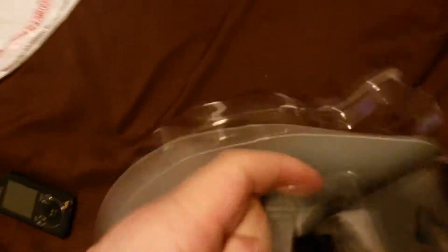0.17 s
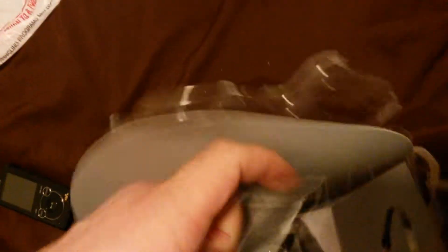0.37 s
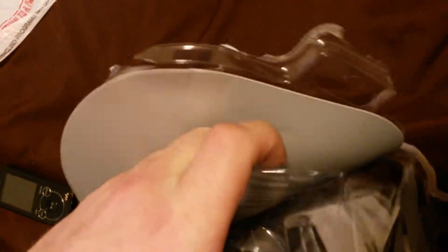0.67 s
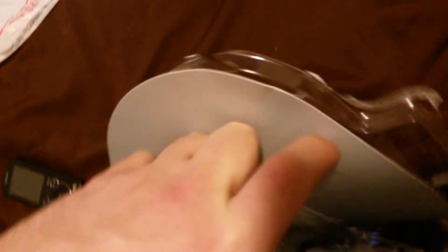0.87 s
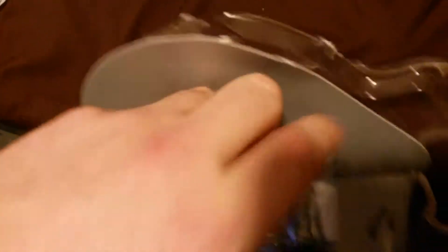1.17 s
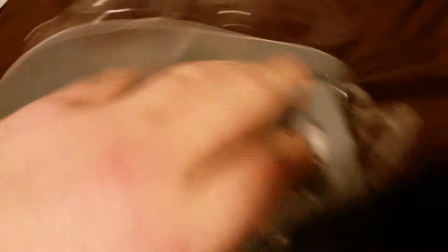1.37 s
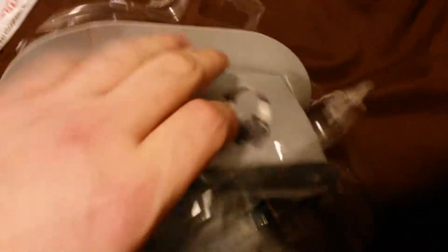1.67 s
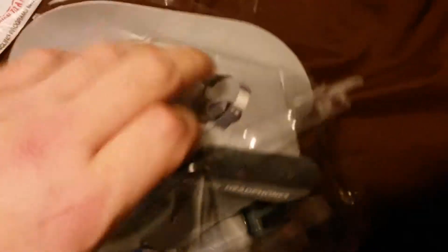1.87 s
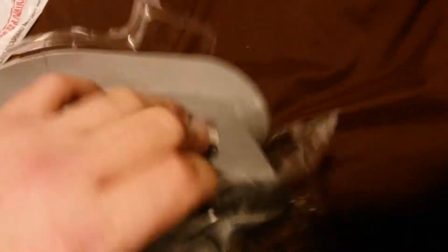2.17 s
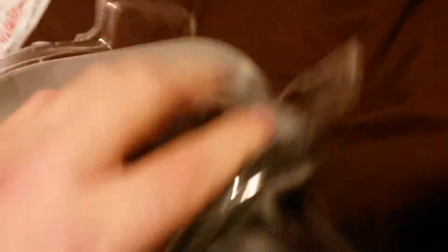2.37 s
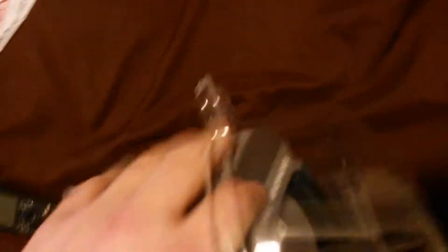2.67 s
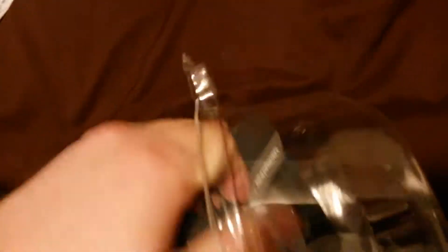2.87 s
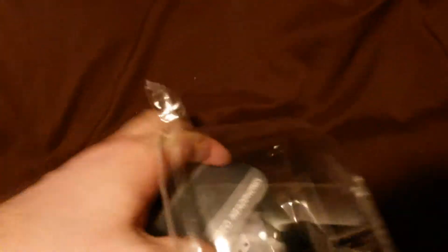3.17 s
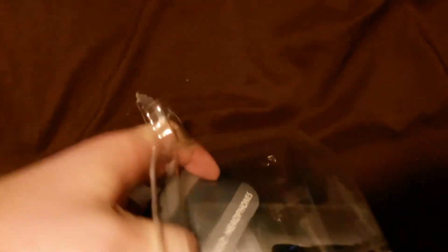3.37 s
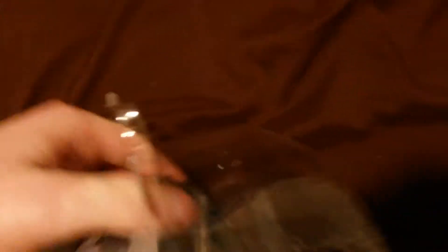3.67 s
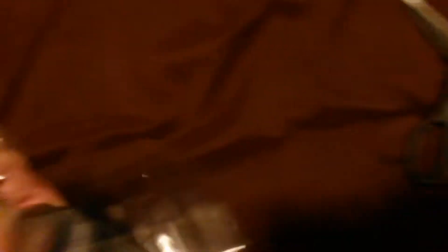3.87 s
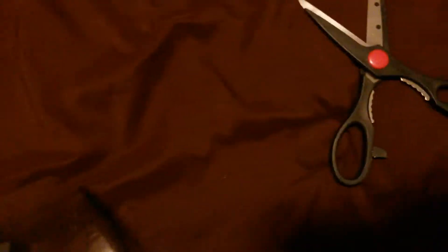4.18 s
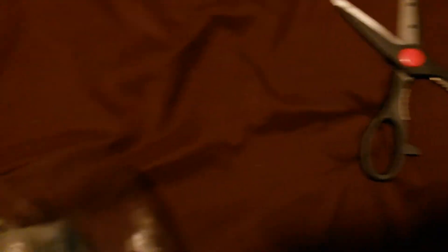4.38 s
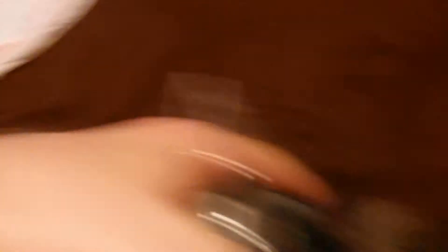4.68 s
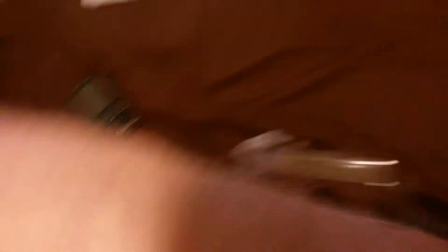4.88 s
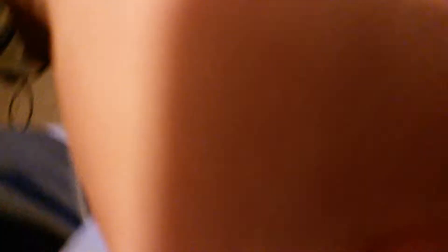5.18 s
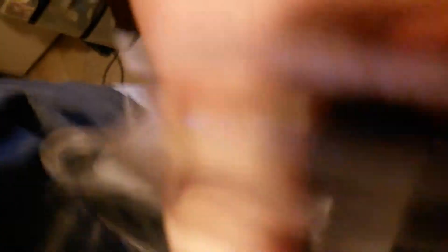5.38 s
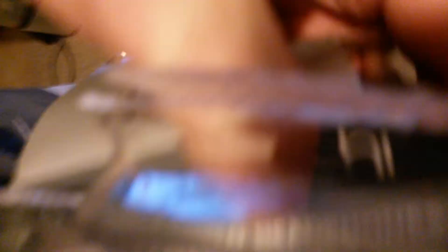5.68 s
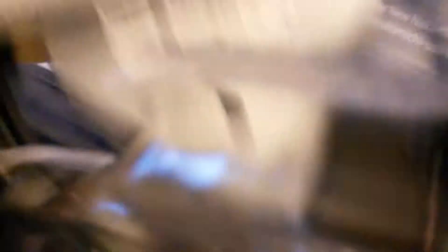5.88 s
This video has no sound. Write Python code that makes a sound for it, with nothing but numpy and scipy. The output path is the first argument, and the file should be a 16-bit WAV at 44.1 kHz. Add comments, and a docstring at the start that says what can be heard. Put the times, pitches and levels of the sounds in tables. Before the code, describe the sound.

Close stereo capture of rigid plastic packaging being pulled about by hand. Bright, dry crackles and lower buckling pops come in irregular clusters, with brief hissing slides and soft thuds of the whole pack. It quietens shortly before the end, then crunches loudly and is knocked on the right. Short room reflections and a low, quiet fan hum surround it.

```python
"""Stiff clear package, pulled open close by

Hands flex a plastic package just in front of a microphone pair, in a small room with a humming fan.
Facets buckle as short bursts of filtered noise: a sharp crack, a panel flex and a hollow shell ring.
Sheets slide as stick-slip noise, knocks are dull thuds; at last the pack swings past the pair and is bumped.
The room answers with decaying noise, the fan is an air rush with tones, and each microphone port rings
at its own treble pitch, which colours every snap."""
import sys
import numpy as np
from scipy import signal
from scipy.fft import rfft, irfft, next_fast_len
from scipy.io import wavfile
from scipy.ndimage import uniform_filter1d, map_coordinates

SR = 44100
rng = np.random.default_rng(int(sys.argv[2]) if len(sys.argv) > 2 else 0)


def unload_audio(sound):
    """Save the sound as a 16-bit wav file, at the path given as the first command line argument."""
    columns = np.transpose(np.atleast_2d(sound))
    # keep every value between -1 and 1, then stretch to whole-number steps
    steps = np.round(np.clip(columns, -1, 1) * 32767)
    wavfile.write(sys.argv[1], SR, steps.astype(np.int16))


N = 265923

# Facets that buckle: [t/s, crack level/dB, flex level/dB, shell level/dB, crack t60/s, left over right/dB];
# the crack level is before CRACK_TRIM_DB
FACET_SNAPS = [(.074, -35, -43, -66, 0.0083, 8), (.1742, -43.5, -46, -53, .008, 1),
               (.2244, -39.5, -50, -53, .025, 4), (.2406, -11, -13.5, -38, 0.004, 5),
               (.2571, -17.5, -24, -30, 0.019, 0.5), (.361, -24, -27.5, -35.5, 0.013, 7),
               (.4232, -38.5, -42, -37.5, 0.031, -1), (.4727, -75, -36.5, -46, 0.0077, 1),
               (.503, -70, -36, -45, 0.016, -5), (.5325, -40, -42, -59, 0.022, -2),
               (.7182, -18.5, -30.5, -44.5, 0.013, -3.5), (.8115, -46, -45, -44, 0.011, 2),
               (1.1163, -51, -43, -56, 0.017, 5), (1.1624, -37, -46, -50, 0.02, 2),
               (1.1765, -33.5, -26, -34.5, 0.017, 5), (1.2113, -31, -23.5, -37, 0.0054, 16),
               (1.2174, -26.5, -51, -56, 0.029, 1.5), (1.2945, -21, -25.5, -40.5, 0.011, 10),
               (1.3597, -32.5, -28, -40, 0.022, 6), (1.38, -27.5, -32, -59, 0.023, 2),
               (1.404, -24.5, -30, -39, 0.017, -1), (1.4824, -31.5, -40, -42, .013, -2),
               (1.589, -38, -43.5, -62, 0.043, 8), (1.6154, -40, -48, -43.5, 0.019, 11),
               (1.7519, -20, -27, -45, 0.0053, 3), (1.7734, -22.5, -37.5, -42, 0.011, 3),
               (1.8039, -30, -39, -33, 0.0033, 7), (1.8345, -28, -55, -62, 0.0044, 10),
               (1.845, -24, -39, -44, 0.0013, 2), (1.8679, -23.5, -42, -42.5, 0.0069, 15),
               (1.9514, -33.5, -47, -44.5, 0.02, 12), (2.0597, -21.5, -33, -41.5, 0.0085, 8),
               (2.1715, -49, -39, -36.5, 0.018, 3), (2.1932, -63, -36, -51, 0.011, -5),
               (2.2208, -19.5, -31.5, -29, 0.0071, 0.5), (2.2236, -26, -29.5, -28.5, 0.071, -1),
               (2.2473, -25, -42, -43, 0.069, 3), (2.3696, -21, -39, -30.5, 0.011, -3),
               (2.3738, -29, -23.5, -32.5, 0.0031, 3), (2.4079, -27.5, -60, -56, 0.0053, 11),
               (2.455, -31, -41.5, -57, .01, 13), (2.4857, -19.5, -22.5, -25, 0.0069, 6),
               (2.5493, -24.5, -30.5, -25, 0.0071, 1), (2.5575, -27.5, -38, -31, 0.071, 5),
               (2.6217, -29, -38, -27.5, 0.013, 13), (2.6572, -61, -22.5, -41, 0.003, -9.5),
               (2.7075, -38, -59, -60, 0.0025, 13), (2.794, -29, -33.5, -34, 0.015, 8.5),
               (2.918, -34.5, -38, -32, 0.12, 2), (2.9754, -22, -41.5, -66, 0.004, 14),
               (3.0397, -42, -40, -43, 0.019, -2), (3.1064, -35.5, -49.5, -52, 0.0065, 13),
               (3.153, -39, -39.5, -40.5, 0.015, 0), (3.2613, -39, -39.5, -44.5, 0.021, -0.5),
               (3.5504, -36, -34, -36.5, 0.021, -13), (3.7202, -28, -46, -50, .003, 9),
               (3.7584, -28, -39.5, -45, 0.0085, 3.5), (3.8, -28, -33.5, -32.5, 0.0054, 1),
               (3.806, -16, -29, -39, 0.015, -3.5), (3.9109, -27, -44.5, -61, 0.0044, 7),
               (3.9315, -50, -36, -48, 0.0092, -4), (3.9698, -31, -39, -55, 0.028, -14),
               (4.0235, -16.5, -28.5, -30.5, 0.02, 9), (4.0541, -22, -30, -24, 0.035, -6),
               (4.19, -38.5, -45.5, -51, 0.11, -3.5), (4.4829, -26.5, -40, -39, 0.0083, 6),
               (4.5023, -17, -37.5, -29, 0.013, -3.5), (4.513, -28, -37.5, -27.5, 0.022, -2),
               (4.5592, -33.5, -48, -43.5, 0.039, 0), (4.7283, -13, -20.5, -27.5, 0.022, 1.5),
               (4.9605, -27.5, -34, -39.5, 0.028, -4.5), (5.0106, -55, -41, -45.5, .009, 7),
               (5.5986, -49, -28.5, -41.5, 0.0072, 2), (5.6105, -31.5, -17.5, -21.5, .009, -4.5),
               (5.621, -38, -32, -25, 0.031, -9), (5.6334, -20.5, -19.5, -27, 0.007, -4.5),
               (5.6529, -39, -18.5, -27, 0.0079, 6), (5.7197, -38.5, -32, -40.5, 0.04, -3),
               (5.7397, -46, -30.5, -40, 0.0084, -2), (5.8358, -37, -33.5, -39.5, 0.12, 3),
               (5.8938, -41, -25, -25.5, 0.0071, 0), (5.908, -17.5, -17, -23, 0.019, -9),
               (5.935, -20, -18, -35, 0.013, -12.5), (5.9857, -34, -21.5, -38, 0.011, -5)]
# Knocks of the whole pack: [t/s, level/dB, centre of the added peak f/Hz, t60/s]
PACK_BUMPS = [(0.242, -24.5, 200, 0.019), (.256, -31, 75, 0.08), (.423, -39, 330, 0.03),
              (2.222, -42, 280, 0.13), (2.549, -38.5, 250, 0.18), (2.916, -37.5, 300, 0.051),
              (3.025, -42.5, 330, .06), (4.029, -32.5, 172, 0.17), (4.056, -45, 310, 0.1),
              (4.255, -42, 160, 0.046), (4.408, -48, 500, 0.092), (4.503, -30, 131, 0.037),
              (4.586, -55, 550, 0.055), (4.65, -43, 450, 0.022), (5.412, -47, 750, .09),
              (5.618, -32, 300, 0.19), (5.874, -28, 91, 0.094), (5.906, -24, 330, 0.049),
              (5.919, -14, 220, 0.088), (5.951, -21.5, 88, 0.086), (5.99, -38.5, 79, 0.11)]
# Part of the pack being worked: [t/s, left over right of the sliding/dB, facet f/Hz, base panel f/Hz]
WORKED_PART = [(0, 6.5, 5300, 2700), (1.2, 4, 5400, 2800), (2.1, 4.5, 5500, 2570), (2.6, 3, 5360, 2010),
               (3.6, .5, 6700, 2730), (4.498, -3, 6900, 2000), (5.3, 2, 6000, 3020),
               (5.7, -6.5, 7800, 2640), (5.91, -11, 10400, 1820), (6.03, -1, 9150, 2740)]
# Sheets sliding over each other or the skin:
# [t/s, length/s, scrape level/dB, hollow rustle level/dB, rise over the stroke/dB]
SLIDING_STROKES = [(0, 0.0088, -35, -38.5, 0.5), (0.262, .13, -38.5, -50.5, -13.5),
                   (0.443, .03, -47, -38.5, 2), (0.581, .09, -42.5, -51.5, -1),
                   (.725, .06, -45.5, -52.5, -7.5), (1.255, 0.036, -36, -57, 13.5),
                   (1.317, .14, -39, -48, 1.5), (1.567, 0.029, -31, -62, -4), (1.638, .065, -40, -47, 3),
                   (1.763, .06, -41, -51, 0.5), (1.882, 0.13, -43, -50.5, -5), (2.1, 0.077, -35.5, -68, 0),
                   (2.265, .08, -43, -50.5, -2), (2.563, .135, -37, -45, 0.5),
                   (2.733, 0.084, -49, -49, -0.5), (2.828, 0.022, -43, -72, 1),
                   (2.926, .11, -43, -50.5, -4.5), (3.236, .085, -42.5, -44, -4),
                   (3.394, 0.12, -48, -54.5, -3), (3.529, .095, -32.5, -45, -7),
                   (3.766, .03, -43, -51, 0.5), (3.805, .075, -39.5, -45, -8.5), (3.955, .12, -33, -44, 6),
                   (4.032, .04, -35.5, -30, -7.5), (4.243, .07, -39.5, -50, -12),
                   (4.387, .1, -41.5, -45, 2), (4.563, .165, -43.5, -50.5, -1.5),
                   (4.735, .09, -36.5, -49.5, -14.5), (4.879, 0.055, -44.5, -60, -2),
                   (5.371, .11, -50, -48, 3), (5.632, .19, -42, -43, -7.5), (5.841, .19, -32, -34.5, 8),
                   (5.895, .05, -30, -25, 2.5), (5.993, .03, -28.5, -36, 4)]
# Firmness of the hold between strokes: [t/s, level/dB]
HAND_GRIP = [(0, -1), (.9, 1.5), (1.15, 0.5), (1.5, 4), (1.74, -3.5), (2.45, -3.5), (3.1, 4.5), (3.7, -3.5),
             (4.6, 2), (5.2, -0.5), (5.46, -8), (5.51, -20), (5.58, -14), (6.03, -1)]

# Spectrum of a facet's crack: [f/Hz, relative level per Hz/dB]
CRACK_SPECTRUM = [(1500, -31.5), (3200, -8.5), (4500, -3.5), (7000, -1.5), (10000, -2), (15000, 3.5)]
# Spectrum of a flexing panel: [f/Hz, relative level per Hz/dB]
FLEX_SPECTRUM = [(400, -47), (900, 4.5), (1300, 4.5), (2600, -2), (3800, -3), (5500, -8), (10000, -59)]
# Spectrum of the hollow shell: [f/Hz, relative level per Hz/dB]
SHELL_SPECTRUM = [(50, -25), (130, -6), (300, 1.5), (520, 6), (900, -0.5), (1400, -3.5), (3000, -62.5)]
# Spectrum of the sliding hiss: [f/Hz, relative level per Hz/dB]
SCRAPE_SPECTRUM = [(900, -7), (2200, -2.5), (4000, 0.5), (6500, -0.5), (9000, 0), (14500, -2)]
# Spectrum of the hollow rustle: [f/Hz, relative level per Hz/dB]
RUSTLE_SPECTRUM = [(60, -21.5), (180, -8), (380, -3.5), (800, -6.5), (1300, -8.5), (2500, -12.5),
                   (8000, -48.5)]
# Spectrum of a knock before its peak: [f/Hz, relative level per Hz/dB]
THUD_SPECTRUM = [(20, -15), (55, -3.5), (110, 0.5), (200, -6.5), (320, -1), (480, -14.5), (1000, -44)]
# Spectrum of the fan's air: [f/Hz, relative level per Hz/dB]
AIR_SPECTRUM = [(20, -26), (45, -25), (85, -7), (270, -1), (550, -9.5), (1200, -21.5), (4000, -23.5),
                (15000, -23.5)]
# Mains and blade tones of the fan: [f/Hz, rms level/dB]
FAN_TONES = [(120, -60.5), (221, -71), (425, -78.5), (705, -77)]
# Left-right likeness at the microphone pair: [f/Hz, correlation from 0 to 1]
LIKENESS = [(60, 0.45), (300, 0.87), (700, 0.74), (1500, 0.38), (3000, 0.03), (15000, 0.039)]
# Decay of the small room: [f/Hz, t60/s]
ROOM_DECAY = [(100, 0.12), (500, 0.23), (3000, 0.27), (7000, 0.22), (15000, 0.19)]
# Response of the left microphone port: [f/Hz, level/dB]
LEFT_RESPONSE = [(500, -3.5), (1400, -5), (2400, -0.5), (3600, 3), (4800, 7), (5500, 9), (6050, 11.5),
                 (6800, 8.5), (8200, 1.5), (10200, -3), (14500, -16.5)]
# Response of the right microphone port: [f/Hz, level/dB]
RIGHT_RESPONSE = [(500, -2), (1300, -5.5), (2000, -6), (4500, -5.5), (6800, -5), (8400, 7), (10000, -3.5),
                  (14500, -14)]

CRACK_TRIM_DB = 1
# A facet creeps before it flips: shortest 60 dB rise, plus this share of its t60
CREEP_S, CREEP_SHARE = 0.0026, 0.21
PANEL_DB_PER_OCTAVE = 58  # the more flex outweighs crack, the lower the panel
# Small random facets: crack over the scrape, its scatter either way, its t60
SMALL_DB, SMALL_SCATTER_DB, SMALL_T60_S = -3, 4, .005
SMALL_FLEX_DB, SMALL_SHELL_DB = -7.5, -15.5  # relative to their table crack
STROKE_ATTACK_S, STROKE_RELEASE_T60_S = 0.013, 0.1
GRIP_SCRAPE_DB, GRIP_RUSTLE_DB = -54, -59.5  # faint sliding at a grip of 0 dB
BASS_CUT_HZ, TOP_HZ = 40, 14800


def snaps(facet_db=7, facet_octaves=0.51, panel_db=9, panel_octaves=0.91, uneven_db=3,
          flex_ring=1.66, shell_t60=0.047, after_db=-26, after_t60=0.015, size=4096):
    """Each facet creeps, flips with a crack, flexes its panel and sets the hollow shell ringing."""
    out = np.zeros((2, N))
    lead = 1 / 100  # s kept before the flip for the creep
    t = np.arange(size) / SR - lead
    since, before = np.maximum(t, 0), np.maximum(-t, 0)
    place_s, _, facets_hz, panels_hz = np.transpose(WORKED_PART)
    for s, crack, flex, shell, t60, left_db in list(FACET_SNAPS) + small_snaps():
        facet_hz = np.interp(s, place_s, facets_hz)
        panel_hz = np.interp(s, place_s, panels_hz) * 2 ** ((crack - flex) / PANEL_DB_PER_OCTAVE)
        rise = CREEP_S + CREEP_SHARE * t60
        swell = amp(-60 * before / max(rise, 1e-4))
        modes = ripple()

        def dying(life):
            return swell * amp(-60 * since / max(life, 1e-3))

        def facet_gain(hz):
            peak = facet_db * hill(hz, facet_hz, facet_octaves)
            return along(CRACK_SPECTRUM, hz) + peak + uneven_db * modes(hz)

        def panel_gain(hz):
            peak = panel_db * hill(hz, panel_hz, panel_octaves)
            return along(FLEX_SPECTRUM, hz) + peak + uneven_db * modes(hz)

        # bending waves run on through the sheet after the flip
        sheet = amp(after_db) * dying(after_t60)
        bright = amp(crack + CRACK_TRIM_DB) * burst(dying(t60) + sheet, facet_gain)
        bend = amp(flex) * burst(dying(t60 * flex_ring) + sheet, panel_gain)
        hollow = amp(shell) * burst(dying(shell_t60), lambda hz: along(SHELL_SPECTRUM, hz))
        add(out, s - lead, panned(left_db) * (bright + bend) + hollow)
    return out


def small_snaps(count=28):
    """Random small facets give way, more of them and louder where the sheets slide harder."""
    scrape_db, _ = sliding()
    left_db, _, _ = curves(WORKED_PART)
    work = np.cumsum(np.sqrt(amp(scrape_db / 2)))
    when, size, side = rng.random((count, 3)).T
    at = np.minimum(np.searchsorted(work, when * work[-1]), N - 1)
    cracks = scrape_db[at] + SMALL_DB + SMALL_SCATTER_DB * (2 * size - 1)
    sides = left_db[at] + 10 * (side - .5)
    return [(s, db, db + SMALL_FLEX_DB, db + SMALL_SHELL_DB, SMALL_T60_S, left)
            for s, db, left in zip(at / SR, cracks, sides)]


def ripple(spacing_hz=330, size=90):
    """The uneven modes of one patch of sheet: a random gain of frequency, about +-1."""
    heights = rng.standard_normal(size)
    return lambda hz: np.interp(hz, np.arange(size) * spacing_hz, heights)


def burst(envelope, gain_db):
    """Many close modes struck at once, as noise with the energy of 10 ms at rms 1."""
    noise = rng.standard_normal((2, len(envelope)))
    sound = spread(coloured(envelope * noise, gain_db))
    energy = np.mean(np.sum(sound ** 2, axis=1))
    return sound * np.sqrt(SR / 100 / (energy + 1e-20))


def rubbing(flutter_db=2.5, lumps_db=3.5):
    """Sliding sheets hiss and tick by stick-slip, and the shell adds a lumpy, hollow rustle."""
    scrape_db, rustle_db = sliding()
    left_db, _, _ = curves(WORKED_PART)
    ticks = slips(rate=200, scatter_db=5, life=.0011)
    roughness = np.hypot(.65, .7 * ticks)  # steady hiss and ticks together
    pressure_db = flutter_db * wobble(45)

    def friction(spectrum):
        noise = roughness * rng.standard_normal((2, N))
        return unit(spread(coloured(noise, lambda hz: along(spectrum, hz))))

    scrape = amp(scrape_db + pressure_db) * panned(left_db) * friction(SCRAPE_SPECTRUM)
    rustle_gain = amp(rustle_db + lumps_db * wobble(40))
    rustle = rustle_gain * panned(left_db / 2) * friction(RUSTLE_SPECTRUM)
    return scrape + rustle


def sliding():
    """Scrape and rustle levels/dB: grip plus each stroke's attack, swelling or sinking hold, and release."""
    grip_db, = curves(HAND_GRIP)
    power = amp([grip_db + GRIP_SCRAPE_DB, grip_db + GRIP_RUSTLE_DB]) ** 2
    t = np.arange(SR // 2) / SR
    for s, length, scrape_db, rustle_db, swell_db in SLIDING_STROKES:
        attack = np.minimum(t / STROKE_ATTACK_S, 1)
        hold = amp(swell_db * (np.minimum(t / length, 1) - .5))
        release = np.exp(-np.log(1000) * np.maximum(t - length, 0) / STROKE_RELEASE_T60_S)
        levels = amp([[scrape_db], [rustle_db]])
        add(power, s, (levels * attack * hold * release) ** 2)
    return 10 * np.log10(power)


def slips(rate, scatter_db, life):
    """Envelope of tiny stick-slip releases at random times, a few much larger than the rest."""
    sizes = amp(scatter_db * np.minimum(rng.exponential(size=N), 2.5))
    kicks = (rng.random(N) < rate / SR) * sizes
    releases = signal.lfilter([1], [1, -np.exp(-1 / (life * SR))], kicks)
    # the hand feeds in work steadily, so nearby releases share it
    nearby_power = np.abs(uniform_filter1d(releases ** 2, size=2600))
    return releases / np.sqrt(nearby_power + 1e-6)


def bumps(attack=0.0023, peak_db=8, peak_octaves=1.0):
    """Soft knocks move the pack as a whole: a short dull thud."""
    out = np.zeros((2, N))
    t = np.arange(SR // 4) / SR
    for s, db, pitch_hz, t60 in PACK_BUMPS:
        envelope = (1 - np.exp(-t / attack)) * np.exp(-np.log(1000) * t / t60)

        def thud_gain(hz):
            return along(THUD_SPECTRUM, hz) + peak_db * hill(hz, pitch_hz, peak_octaves)

        add(out, s, amp(db) * burst(envelope, thud_gain))
    return out


def room(x, build=0.0039, count=24):
    """The room's diffuse answer, decaying noise drawn afresh each stretch as the pack moves."""
    out = np.zeros((2, N))
    hop = N // count + 1
    for start in range(0, N, hop):
        hz, t, z = signal.stft(rng.standard_normal((2, SR // 2)), SR, nperseg=256)
        decay = np.exp(-np.log(1000) * t / along(ROOM_DECAY, hz)[:, None])
        onset = 1 - np.exp(-t / build)
        tail = signal.istft(z * decay * onset, SR, nperseg=256)[1]
        tail = spread(tail) / np.linalg.norm(tail[0])
        mono = x[:, start:start + hop].sum(axis=0, keepdims=True) / np.sqrt(2)
        add(out, start / SR, signal.fftconvolve(mono, tail, axes=1))
    return out


def fan(air_db=-59, waver=0.6):
    """A steady rush of air and a few tones whose phase wanders slightly (waver in radians)."""
    t = np.arange(N) / SR
    noise = rng.standard_normal((2, N))
    air = unit(spread(coloured(noise, lambda hz: along(AIR_SPECTRUM, hz))))
    tones = np.zeros(N)
    for hz, db in FAN_TONES:
        phase = 2 * np.pi * hz * t + waver * wobble(2.5)
        tones += amp(db) * np.sqrt(2) * np.sin(phase)
    return amp(air_db) * air + tones


def amp(db):
    """Decibels to gain."""
    return 10 ** (np.asarray(db) / 20)


def unit(x):
    """x scaled to rms 1."""
    return x / np.sqrt(np.mean(x ** 2) + 1e-20)


def along(points, hz):
    """(Hz, value) points read on a log axis."""
    f, v = np.transpose(points)
    return np.interp(np.log(hz + 1), np.log(f + 1), v)


def hill(hz, centre_hz, octaves):
    """A broad resonance of height 1 on a log-frequency axis."""
    return np.exp(-(np.log2((hz + 1) / centre_hz) / octaves) ** 2)


def curves(rows):
    """One value per sample for each column after the time."""
    s, *cols = np.transpose(rows)
    return [np.interp(np.arange(N) / SR, s, c) for c in cols]


def wobble(rate):
    """A smooth random curve, rate knots a second."""
    knots = rng.standard_normal(int(N * rate / SR) + 4)
    return map_coordinates(knots, [np.arange(N) * rate / SR])


def panned(left_db):
    """Left and right gains of constant power."""
    gains = amp(np.array([left_db, -left_db]) / 2).reshape(2, -1)
    return gains / np.sqrt(np.mean(gains ** 2, axis=0))


def coloured(x, gain_db, size=2048):
    """x through the causal minimum-phase filter whose gain is gain_db(Hz)."""
    cepstrum = irfft(np.log(amp(gain_db(np.fft.rfftfreq(size, 1 / SR)))))
    # folding the cepstrum onto positive times makes the filter causal
    cepstrum[1:size // 2] *= 2
    cepstrum[size // 2 + 1:] = 0
    response = irfft(np.exp(rfft(cepstrum)))
    response = response.reshape((1,) * (x.ndim - 1) + (-1,))
    return signal.fftconvolve(x, response, axes=-1)[..., :x.shape[-1]]


def spread(pair):
    """Two unrelated signals become left and right: more alike in the bass, apart in the treble."""
    size = next_fast_len(pair.shape[1] + 512)
    likeness = along(LIKENESS, np.fft.rfftfreq(size, 1 / SR))
    turn = np.arccos(np.clip(likeness, -1, 1)) / 2
    mid, side = irfft(rfft(pair, size) * [np.cos(turn), np.sin(turn)], size)[:, :pair.shape[1]]
    return np.array([mid + side, mid - side])


def add(track, s, sound):
    """Mix a two-row sound in at time s."""
    start = max(round(s * SR), 0)
    part = track[:, start:start + sound.shape[1]]
    part += sound[:, :part.shape[1]]


def scene(room_db=-15):
    """The pack close by, the room around it and the fan behind."""
    pack = snaps() + bumps() + rubbing()
    return pack + amp(room_db) * room(pack) + fan()


def record(dry):
    """Each port rings at its own pitch; deep bass and top treble are cut; the loudest cracks flatten."""
    left = coloured(dry[0], lambda hz: along(LEFT_RESPONSE, hz))
    right = coloured(dry[1], lambda hz: along(RIGHT_RESPONSE, hz))
    bass_cut = signal.butter(2, BASS_CUT_HZ, "highpass", fs=SR, output="sos")
    lean = signal.sosfilt(bass_cut, np.array([left, right]))
    flattened = lean / (1 + np.abs(lean / .9) ** 6) ** (1 / 6)
    top_cut = signal.ellip(10, .1, 80, TOP_HZ, fs=SR, output="sos")
    return signal.sosfilt(top_cut, flattened)


dry = scene()
out = record(dry)
unload_audio(out)
```